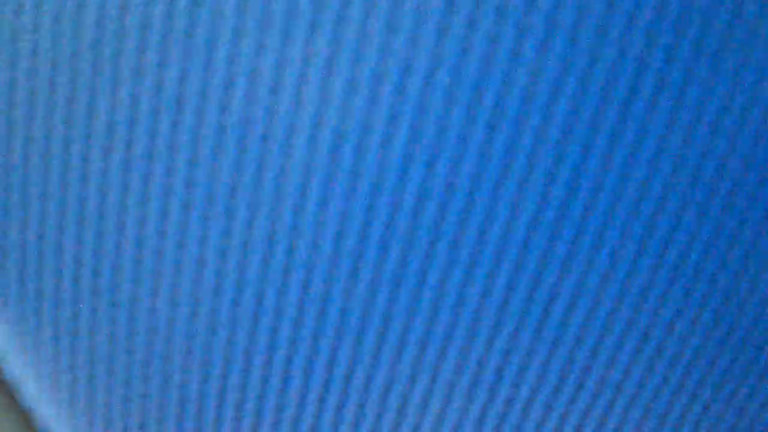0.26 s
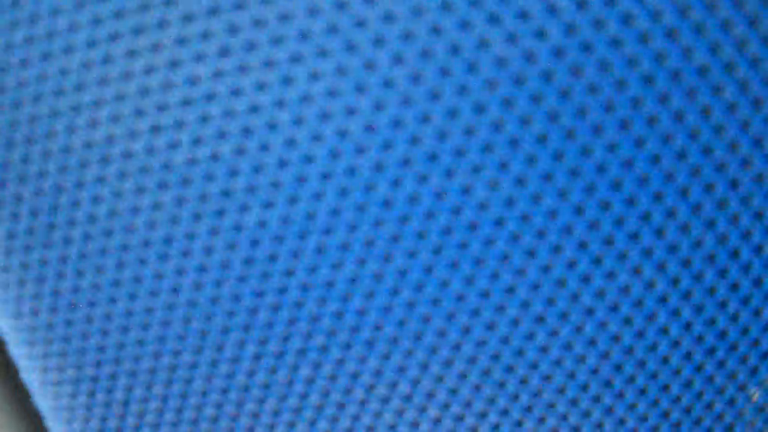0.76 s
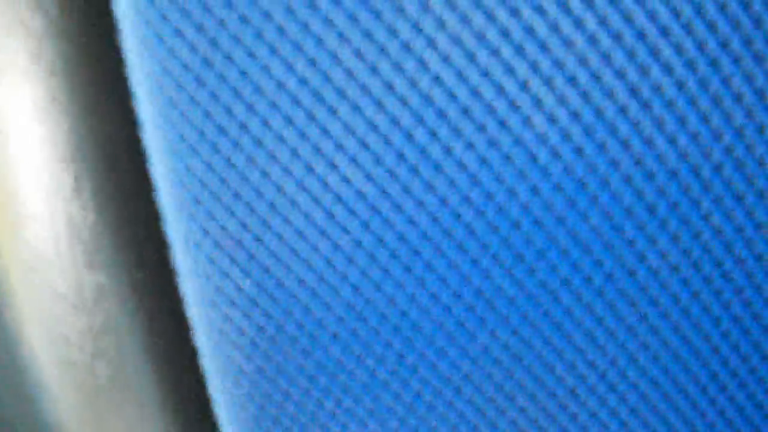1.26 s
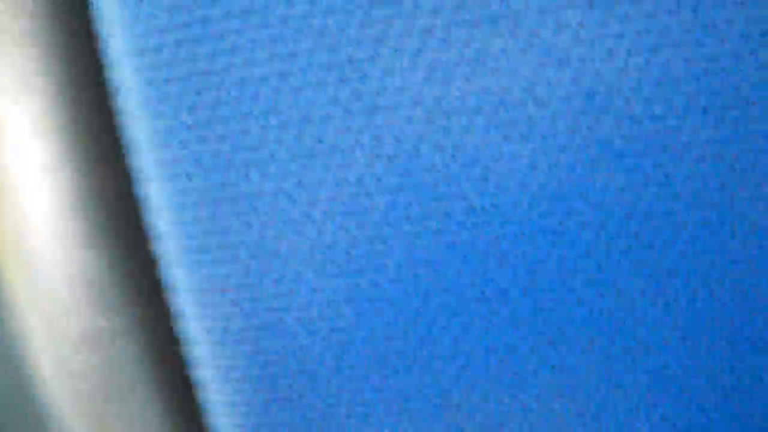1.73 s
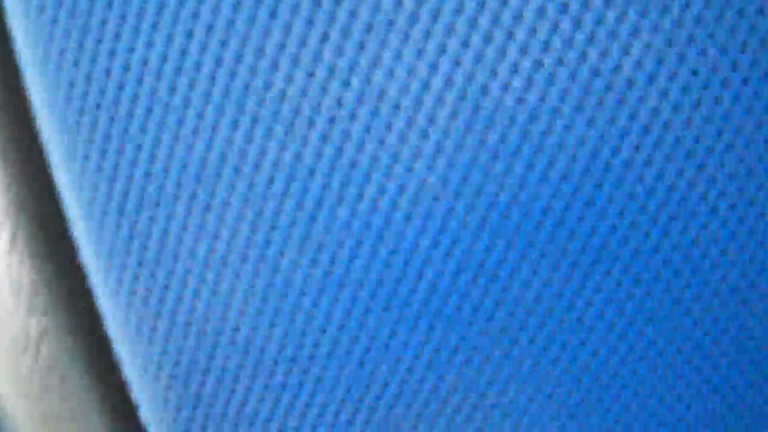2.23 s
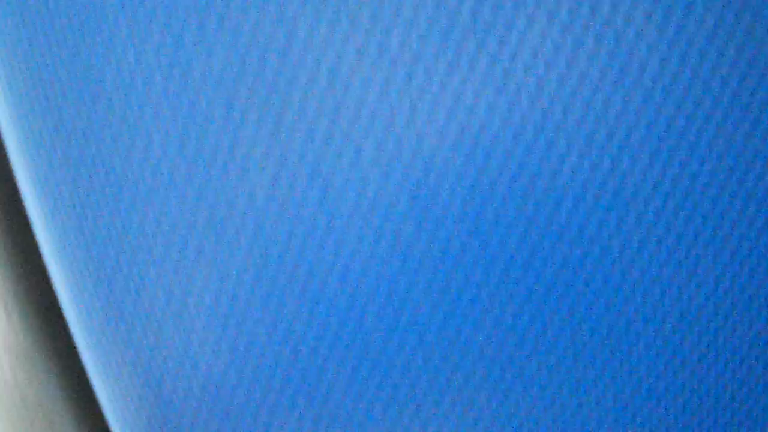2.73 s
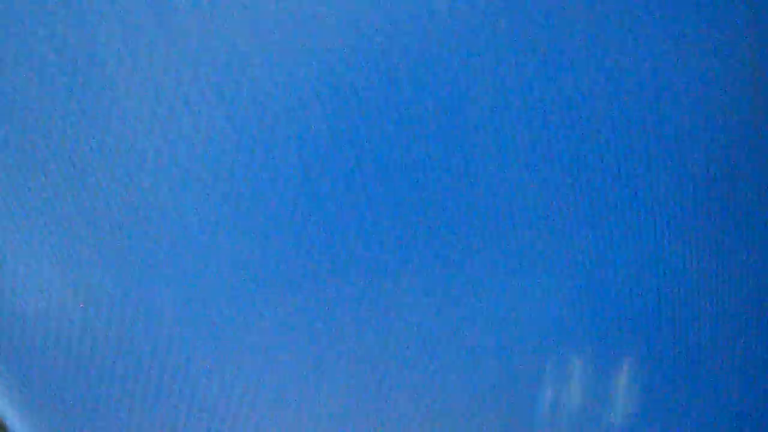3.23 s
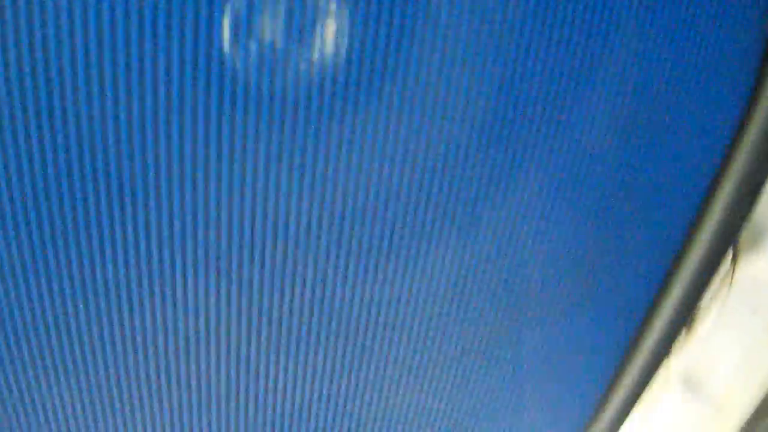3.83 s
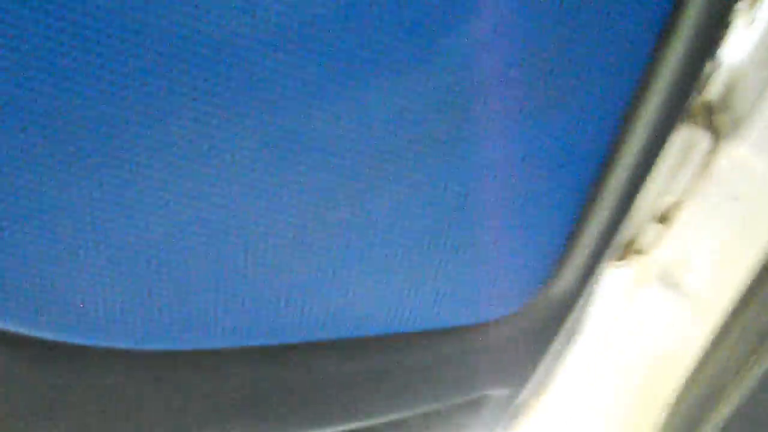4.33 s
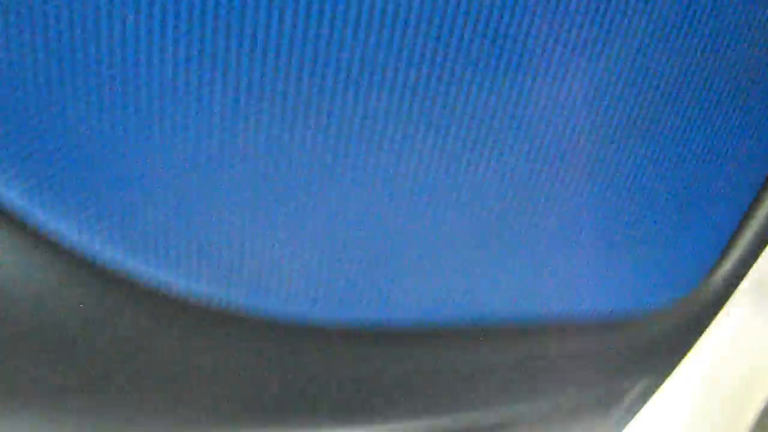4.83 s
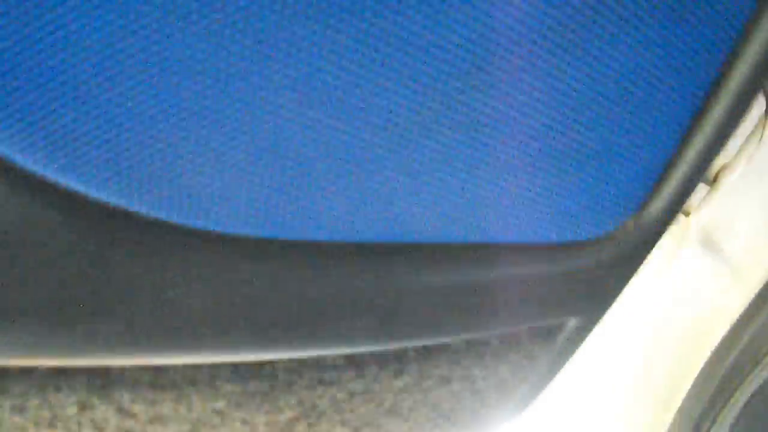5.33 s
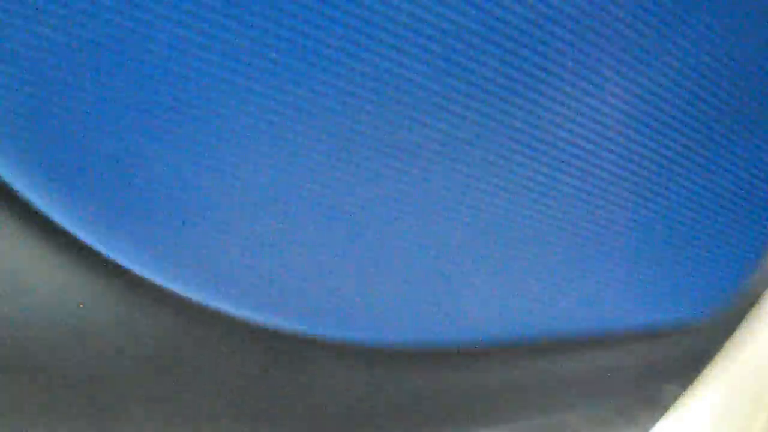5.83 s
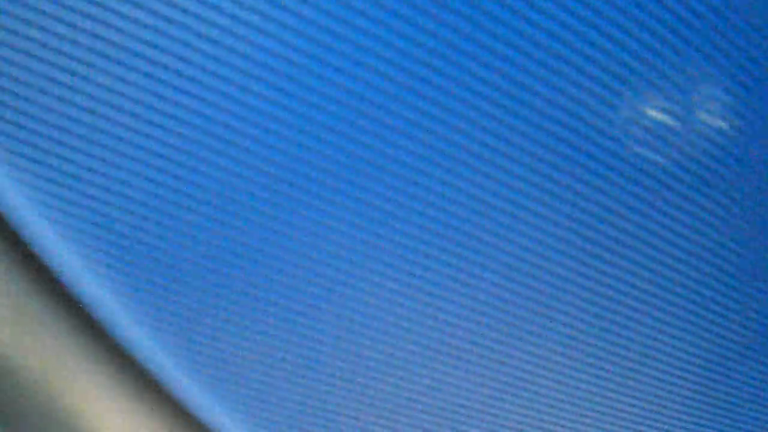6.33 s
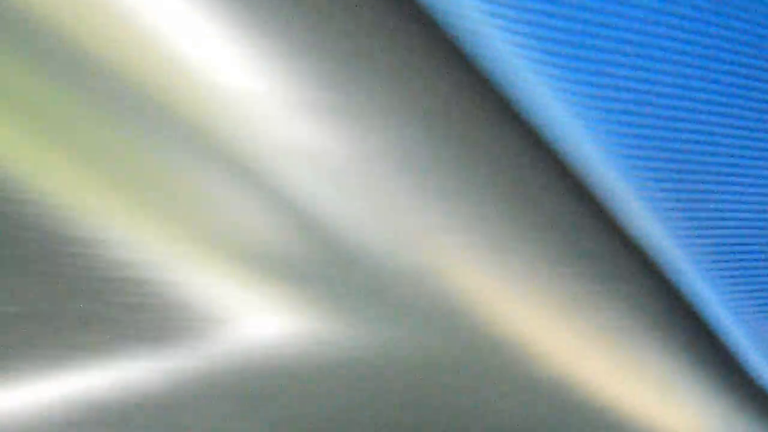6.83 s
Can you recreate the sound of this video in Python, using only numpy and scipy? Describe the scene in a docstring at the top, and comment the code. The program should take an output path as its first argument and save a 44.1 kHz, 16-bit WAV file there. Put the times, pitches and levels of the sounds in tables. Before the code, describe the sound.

A machine hums over a low rumble and airy hiss while a stiff brush works at a vehicle's carpet, heard close to the floor. Short, hissing strokes grow raspier, some ending in a bright flick, with dull thumps and taps on plastic trim between them. One loud knock briefly hushes the background. The scrubbing carries on and ends with a quick clatter against the trim and a tiny rising squeak.

```python
"""Inside a vehicle's padded cabin, one small microphone close to the floor carpet.
A stiff brush scrubs in quick strokes: bristles hiss, tufts rasp through the pile and drum the floor,
and some strokes end in a bright flick. The brush judders once, thumps the floor, knocks on plastic
trim and squeaks near the end. Behind it a machine hums over rumble and airy hiss; this background
sinks away briefly after the hardest knock."""
import sys
import numpy as np
from scipy import signal
from scipy.fft import rfft, irfft
from scipy.io import wavfile

SR = 44100
rng = np.random.default_rng(int(sys.argv[2]) if len(sys.argv) > 2 else 0)


def transcribe(u):
    """Save the signal u as a 16-bit wav file named by the first command-line argument.

    u: samples, shape (n,) or (channels, n), limited to [-1, 1]; the rate is SR.
    q: integer samples, one column per channel.
    """
    v = np.clip(np.atleast_2d(u).T, -1, 1)
    q = np.round(v * 32767).astype(np.int16)
    wavfile.write(sys.argv[1], SR, q)


N = 312228
TIME = np.arange(N) / SR

# slow drift of the cabin's ambience: (time [s], hum and rumble [dB], airy hiss [dB])
AMBIENCE = [(.1, -38, -44.5), (.7, -34, -42.5), (2.7, -32.5, -39.5), (3.25, -34, -40), (3.85, -29, -41.5),
            (4.4, -30, -38.5), (4.8, -34.5, -43), (6.3, -40.5, -46.5), (6.85, -33.5, -43.5),
            (7.08, -43.5, -46)]


def amp(db):
    """Decibels to gain."""
    return 10 ** (np.asarray(db) / 20)


def unit(x):
    """Scales to rms 1."""
    return x / np.sqrt(np.mean(x ** 2) + 1e-20)


def add(mix, start_s, sound):
    """Mixes a sound in at start_s, or at zero if that is negative."""
    part = mix[max(round(start_s * SR), 0):][:len(sound)]
    part += sound[:len(part)]


def colour(x, spectrum):
    """Filters by a spectrum of (frequency [Hz], level [dB]) points; rms 1."""
    hz, db = np.transpose(spectrum)
    bins = np.fft.rfftfreq(len(x), 1 / SR)
    gain = amp(np.interp(np.log(bins + 1), np.log(hz), db))
    return unit(irfft(rfft(x) * gain, len(x)))


def ring(x, resonances):
    """Steep parallel resonances, each (frequency [Hz], width [Hz], level [dB]); rms 1."""
    out = 0
    for hz, width, db in resonances:
        b, a = signal.iirpeak(hz, hz / (1.55 * width), fs=SR)
        late = np.roll(x, round(SR / hz * 2))  # low modes take longer to swell
        out = out + amp(db) * signal.lfilter(b, a, signal.lfilter(b, a, late))
    return unit(out)


def swept(x, hz, width_hz):
    """A resonance that follows the curve hz; rms 1."""
    turn = np.exp(2j * np.pi * np.cumsum(hz) / SR)
    pole = np.exp(-np.pi * width_hz / SR)
    return unit((turn * signal.lfilter([1], [1, -2 * pole, pole * pole], x / turn)).real)


def wander(rate_hz):
    """Smooth random drift up to about rate_hz; rms 1."""
    steps = TIME[::16]
    bins = np.fft.rfftfreq(len(steps), steps[1])
    spectrum = rfft(rng.standard_normal(len(steps))) * np.exp(-(bins / rate_hz) ** 2)
    return unit(np.interp(TIME, steps, irfft(spectrum, len(steps))))


def clicks(per_s, spread_db):
    """Bristles slip off fibres in random clicks of uneven size; rms 1."""
    size = amp(spread_db * np.minimum(rng.exponential(1, N), 3.5))
    return unit(size * rng.choice([-1, 1], N) * (rng.random(N) < per_s / SR))


def panel_echoes(x, strength, delay_s=0.000688):
    """Two echoes off nearby panels comb the sound; their delays shift as the brush moves."""
    samples = np.arange(N)
    lags = [SR * delay_s * path * (1 + .13 * wander(3)) for path in np.sqrt([1, 6])]
    return unit(x + strength * sum(np.interp(samples - lag, samples, x) for lag in lags))


def stroke_shape(t, length, attack, swell_db, release_db_per_s, touch_db=-16):
    """Gain of one stroke: the brush bites, pressure builds or eases, the brush lifts."""
    bite_db = touch_db * np.maximum(1 - t / attack, 0) ** 2
    pressure_db = swell_db * (np.clip(t / length, 0, 1) - .5)
    return amp(bite_db + pressure_db - release_db_per_s * np.maximum(t - length, 0))


def scrubbing(lead_s=.05):
    """The hand's motion: gains of hiss, rasp, drumming and treble, and the floor's note in Hz."""
    # strokes across the carpet, the last row the rub beneath the squeak: (start [s], length [s], attack [s],
    # swell [dB], hiss [dB], rasp [dB], # drumming [dB], extra treble [dB], pitch of the patch under the brush
    # [Hz])
    strokes = [ (-.012, 0.11, 0.013, 1.5, -24.5, -28.5, -29, -7, 580),
               (0.211, 0.086, 0.042, -15, -39, -45, -43, 0, 490),
               (0.407, 0.14, 0.0074, -1, -25.5, -27.5, -27, -7.5, 400),
               (0.542, 0.12, 0.013, -10, -33, -33, -36, -3, 504),
               (0.797, .11, 0.011, 10.5, -37.5, -39.5, -35.5, -2, 470),
               (0.947, 0.16, 0.09, 0.5, -29.5, -36, -33.5, -4.5, 506),
               (1.266, 0.22, 0.013, -0.5, -30, -37.5, -32.5, -3.5, 524),
               (1.736, 0.14, 0.038, 6.5, -25, -51, -31, -9, 530),
               (2.126, 0.13, 0.018, 6.5, -23.5, -42, -29, -8, 477),
               (2.535, 0.14, 0.03, 2.5, -23, -27, -29, -4.5, 470),
               (2.994, 0.12, 0.032, 5, -21, -28.5, -25, -8, 784),
               (3.503, 0.089, .007, 6, -27.5, -24.5, -30, 0.5, 593),
               (3.687, 0.066, .03, 3, -40.5, -40, -61, 3, 396),
               (3.999, 0.17, 0.045, 8.5, -27, -21, -28.5, 0.5, 538),
               (4.473, 0.21, 0.043, 11, -26, -19.5, -29, 4, 506),
               (4.954, 0.13, 0.033, 9.5, -31, -25.5, -34, 2, 551),
               (5.111, 0.076, 0.011, 3.5, -43, -38.5, -50, 8, 605),
               (5.475, 0.12, 0.044, 1, -44.5, -36.5, -47, 5.5, 607),
               (5.593, 0.065, 0.024, 0, -37.5, -39, -40, 9, 575),
               (6.001, 0.14, 0.013, 11, -30.5, -27, -28.5, 1.5, 428),
               (6.3, 0.018, 0.014, 2, -45, -42, -44, 2, 580),
               (6.548, .14, 0.021, 4.5, -32, -26.5, -28, 1, 566),
               (6.78, 0.058, 0.01, -7, -50, -36.5, -31, -17, 493), ]
    # bent bristles flick free as a stroke ends:
    # (time [s], length [s], hiss [dB], rasp [dB], drumming [dB], pitch of the patch [Hz])
    end_flicks = [ (0.111, 0.01, -23.5, -50, -26, 440), (1.857, 0.029, -22, -33, -28.5, 435),
                  (2.268, 0.013, -23, -56, -24, 365), (2.67, 0.016, -16, -67, -14.5, 453),
                  (3.127, 0.03, -14.5, -31, -17.5, 440), (4.666, 0.035, -13.5, -20, -16, 733),
                  (5.177, 0.061, -42, -48, -54.5, 693), (5.615, 0.018, -31, -32, -47, 695),
                  (6.151, 0.019, -20, -60, -28, 460), ]
    swell_shares, releases_db_per_s = (1.0, 0.27, 0.44), (845, 900.5, 479)  # hiss, rasp, drumming
    t = np.arange(SR // 2) / SR - lead_s
    moves = []
    for start, length, attack, swell_db, *levels, treble_db, hz in strokes:
        gains = [amp(db) * stroke_shape(t, length, attack, share * swell_db, release)
                 for db, share, release in zip(levels, swell_shares, releases_db_per_s)]
        moves.append((start, hz, gains + [amp(treble_db) * gains[0]]))
    for start, length, *levels, hz in end_flicks:
        gains = [amp(db) * np.exp(-2 * (t / length) ** 2) for db in levels]
        moves.append((start, hz, gains + [gains[0]]))
    power, weighted_hz = np.zeros((4, N)), np.zeros(N)
    for start, hz, gains in moves:
        skip = max(round((lead_s - start) * SR), 0)
        for layer, gain in zip(power, gains):
            add(layer, start - lead_s, gain[skip:] ** 2)
        add(weighted_hz, start - lead_s, hz * gains[2][skip:] ** 2)  # louder drumming sets the note
    patch_hz = np.clip(weighted_hz / (power[2] + 1e-30), 300, 900)
    travel = 1 + 0.13 * wander(20)  # the note drifts as the brush travels
    return *np.sqrt(power + 1e-20), patch_hz * travel


def bristle_song():
    """Stiff bristles sing as they drag, their notes drifting as they bend."""
    # the bristles' notes: (frequency [Hz], width [Hz], level relative to the hiss [dB])
    notes = [(1455, 130, -18.5), (2432, 160, -16)]
    bend = 1 + .035 * wander(12)
    return sum(amp(db) * swept(clicks(3000, 2), hz * bend, width) for hz, width, db in notes)


def bristle_hiss(slips, force, treble_gain, hard_db=-22, treble_hz=5000):
    """Many tiny slips merge into a hiss that brightens under pressure."""
    # bristles bent lightly: (frequency [Hz], spectral level [dB])
    light_spectrum = [(760, -23), (1300, -6.5), (1500, -5), (1710, -12.5), (1910, 0), (2430, 1.5),
                      (2910, -2), (4010, 1), (4500, -2.5), (6670, -5), (9880, -10.5), (10600, -15),
                      (11000, -28.5), (14300, -52.5), (22000, -120)]
    # bristles flicking free under pressure: (frequency [Hz], spectral level [dB])
    hard_spectrum = [(940, -12), (1600, -7.5), (2010, -11), (2680, -4), (3180, -8.5), (3700, -3),
                     (5410, -8), (5770, -5), (6250, -7), (7170, -5.5), (9830, -11), (10700, -18.5),
                     (11000, -22.5), (14300, -46.5), (22000, -120)]
    hardness = .5 + .5 * np.tanh((20 * np.log10(force) - hard_db) / 5)
    hiss = (1 - hardness) * colour(slips, light_spectrum) + hardness * colour(slips, hard_spectrum)
    treble = signal.sosfiltfilt(signal.butter(2, treble_hz, "high", fs=SR, output="sos"), hiss)
    body = hiss - treble + (1 - hardness) * bristle_song()
    return force * body + treble_gain * treble


def brush(tuft_share=0.38, rasp_db=-3.5):
    """Close up, single bristles hiss; whole tufts catch and let go, shaking brush head and floor."""
    # resonances of the brush head: (frequency [Hz], width [Hz], level [dB])
    head_modes = [(964, 70, 3), (1052, 178, 4.5), (1292, 110, 1.5), (1507, 194, 5), (1706, 330, 1)]
    # resonances of the floor: (frequency [Hz], width [Hz], level [dB])
    floor_modes = [(312.8, 142, -2), (437, 56, -4.5), (675, 49, -10.5), (754, 133, -2)]
    force, rasp_gain, drum_gain, treble_gain, patch_hz = scrubbing()
    clumps = wander(83)
    grip = amp(0.8 * wander(25))  # the pile grips unevenly
    tufts = clicks(2600, 1.4)
    slips = np.sqrt(1 - tuft_share) * clicks(14000, 1.9) + np.sqrt(tuft_share) * tufts
    catches = tufts + 0.51 * rng.standard_normal(N)
    slips = panel_echoes(slips * amp(1.16 * clumps), strength=.17)
    catches = panel_echoes(catches * amp(0.8 * clumps), strength=.15)
    hiss = bristle_hiss(slips, force, treble_gain)
    rasp = amp(rasp_db) * rasp_gain * ring(catches, head_modes)
    patch = swept(clicks(3000, 2.5), patch_hz, width_hz=130)  # each patch of floor has its own note
    drumming = drum_gain * unit(ring(catches, floor_modes) + 0.85 * patch)
    return hiss + grip * (rasp + drumming)


def background(machine_hz=63.6, hum_share=.46):
    """Farther off, a machine's slowly wavering hum over low rumble and airy hiss."""
    # orders of the hum: (multiple of the running speed, level [dB])
    orders = [(1, -5), (2, 0), (3, -5), (4, -10), (5, -17), (6, -10), (7, -21), (8, -16)]
    # low rumble: (frequency [Hz], spectral level [dB])
    rumble_spectrum = [(12, -22), (25, -6.5), (50, -2.5), (85, -0.5), (110, -5.5), (170, -9.5),
                       (300, -12.5), (450, -20.5), (800, -37), (1500, -58)]
    # airy hiss: (frequency [Hz], spectral level [dB])
    air_spectrum = [(290, -41), (500, -2), (673, 2.5), (728, -1), (955, -1.5), (1870, -4.5), (2330, -4),
                    (4220, -7.5), (6310, -11.5), (7270, -18), (8490, -10.5), (10200, -12.5), (11000, -27),
                    (14300, -59), (22000, -120)]
    times, low_db, air_db = np.transpose(AMBIENCE)
    phase = 2 * np.pi * np.cumsum(machine_hz * (1 + .003 * wander(2))) / SR
    hum = unit(sum(amp(db + 1.5 * wander(2)) * np.sin(order * phase + 2 * np.pi * rng.random())
                   for order, db in orders))
    rumble = colour(rng.standard_normal(N), rumble_spectrum)
    low = np.sqrt(hum_share) * hum + np.sqrt(1 - hum_share) * rumble
    flutter = amp(-0.44 * wander(25))
    air = flutter * colour(rng.standard_normal(N), air_spectrum)
    return amp(np.interp(TIME, times, low_db) - 1) * low + amp(np.interp(TIME, times, air_db)) * air


def rustle(relative_db=-11):
    """Loose bristles shift faintly against the pile, in chance swells under the airy hiss."""
    times, _, air_db = np.transpose(AMBIENCE)
    swells_db = 5 * np.minimum(wander(6.7), 2)
    level = amp(relative_db + np.interp(TIME, times, air_db) + swells_db)
    return level * ring(clicks(3700, 2.5), [(7000, 2200, 0)])


def judder(start_s=0.409, attack_s=0.013, hold_s=0.051, fall_db_per_s=190, level_db=-12, slip_hz=108):
    """The bristles stick and slip in uneven jerks as the brush is pushed down, then settle."""
    # resonances shaken by the jerks: (frequency [Hz], width [Hz], level [dB])
    modes = [(211, 42, 2), (304.5, 21, -0.5), (435, 180, -6), (1083, 250, -15), (1520, 110, -19),
             (2030, 240, -24.5), (2665, 170, -16)]
    t = TIME - start_s
    level = np.clip(t / attack_s, 0, 1) * amp(level_db - fall_db_per_s * np.maximum(t - hold_s, 0))
    turns = np.cumsum(slip_hz * (1 + .16 * wander(59.4))) / SR
    jerks = unit(np.diff(np.floor(turns), prepend=0))  # one pulse a turn
    grit = clicks(2500, 6.2)
    return level * ring(jerks + grit, modes)


def thumps(rough_db=1.1):
    """The padded floor booms and dies away unevenly, its pitch sagging as the push lets off."""
    # soft blows on the floor: (time [s], peak [dB], pitch [Hz], rise [s], t60 [s])
    blows = [(.425, -21, 103, .0073, 0.51), (.799, -3, 93, 0.018, 0.047), (0.839, -12, 108, 0.0037, 0.1),
             (1.279, -19, 83.4, 0.011, 0.094), (2.126, -19, 77, .016, 0.081),
             (3.946, -18, 134, 0.0066, .11), (4.389, -20, 230, .003, 0.056),
             (4.497, -14, 125, 0.017, 0.026), (4.641, -14, 127, 0.0027, 0.11),
             (4.893, -18, 86.6, 0.021, 0.11), (5.056, -22, 99, .014, 0.04),
             (5.404, -32, 109, 0.0099, 0.041), (6.02, -10.5, 99, 0.0077, 0.16),
             (6.11, -19.5, 104, .009, 0.1), (6.456, -14.5, 244, 0.0049, .026),
             (6.475, -22, 264, 0.0026, 0.15), (6.55, -11.5, 194, .0019, 0.057),
             (6.563, -4.5, 93.7, 0.0053, 0.16), (6.57, -13.5, 263, 0.0033, 0.098),
             (6.661, -11, 212, 0.006, 0.02)]
    out, t = np.zeros(N), np.arange(SR // 3) / SR
    sag = 1 + .05 * (2 * np.exp(-t / .02) - 1)
    for start, db, hz, rise, t60 in blows:
        swell = np.sin(np.pi / 2 * np.minimum(t / rise, 1)) ** 2
        decay = amp(-60 * np.maximum(t - rise, 0) / t60)
        phase = 2 * np.pi * np.cumsum(hz * sag) / SR
        add(out, start, amp(db) * swell * decay * np.sin(phase))
    return out * amp(rough_db * wander(70))


def knocks(focus_db_per_octave=6, crack_t60=0.033, rattle_db=-27, rattle_t60=0.2):
    """The brush hits the trim: a crack and ringing modes, weighted to its pitch, and a cabin rattle."""
    # hits on the trim: (time [s], level [dB], focus pitch [Hz], crack [dB], ring time [factor])
    hits = [(.804, -28.5, 900, -1, 2.2), (.495, -19, 4800, 3, 2.1), (2.129, -17, 448, -10, 2),
            (3.3396, -10, 1090, -11, 0.73), (3.756, -23, 1100, -6.5, 1.2), (3.927, -18, 1300, -26, 0.23),
            (3.945, -16, 1000, -13, 0.58), (4.39, -16.5, 520, -11.5, 0.75), (4.498, -16, 1310, -30, 1.2),
            (4.8858, -26.5, 1650, -8, 1.2), (5.097, 6.5, 1050, -8, 0.96), (5.412, -43, 1200, -19, 2.2),
            (6.005, -16, 1500, -22, 0.54), (6.09, -14.5, 1200, -19, 1.6), (6.456, -29.5, 650, -0.5, 2.7),
            (6.561, -12, 450, -19, 0.94), (6.572, -9, 560, -3.5, 1.3), (6.572, -30, 3800, -12, 0.81),
            (6.6356, -11, 664, -9, 1.1), (6.666, -21, 600, -12, 1), (6.712, -19.5, 646, -7.5, 2),
            (6.741, -19.5, 477, -11, 1.6), (6.783, -29, 650, -10, 1.8)]
    # modes of the plastic trim: (frequency [Hz], level [dB], base t60 [s])
    trim_modes = [(247, -4.5, 0.082), (382, 3, 0.027), (514, -2, 0.031), (687, 0.5, 0.04),
                  (1036, -1.5, 0.022), (1146, -8, 0.059), (1350, -1.5, 0.035), (2053, -8, 0.045),
                  (2540, -19.5, 0.029), (3900, -19.5, 0.017), (5840, -8, 0.02), (6460, -10.5, 0.04)]
    mode_hz, mode_db, t60 = np.transpose(trim_modes)[:, :, None]
    crack_hz, crack_shape = np.transpose(
        [(200, -9.5), (900, -6.5), (3000, -0.5), (7000, -1), (11000, -16.5)])
    rattle_spectrum = [(80, -14), (260, 4), (1300, 1), (2200, -5.0), (9000, -28.5)]
    polarity = (-1) ** np.arange(len(trim_modes))[:, None]
    out, t = np.zeros(N), np.arange(SR // 5) / SR
    for start, db, hz, crack_db, ring_factor in hits:
        weight = amp(mode_db - focus_db_per_octave * abs(np.log2(mode_hz / hz)))
        modes = amp(-60 * t / (t60 * ring_factor)) * np.sin(2 * np.pi * mode_hz * t)
        ringing = (polarity * weight * modes).sum(0) / np.linalg.norm(weight)
        crack_noise, rattle_noise = rng.standard_normal((2, len(t)))
        focused_db = crack_shape - focus_db_per_octave * abs(np.log2(crack_hz / hz))
        crack = colour(crack_noise, np.transpose([crack_hz, focused_db]))
        crack *= amp(crack_db - 60 * t / (crack_t60 * ring_factor))
        rattle = colour(rattle_noise, rattle_spectrum) * amp(rattle_db - 60 * t / rattle_t60)
        add(out, start, amp(db) * (ringing + crack + rattle))
    return out


def dip(start_s=5.175, fall_s=0.088, hold_s=0.45, recover_s=0.65, depth_db=-15):
    """Gain of the ambience just after the hardest knock: a quick fall, a hush, a slow return."""
    corners = np.cumsum([start_s, fall_s, hold_s, recover_s])
    return amp(depth_db * np.interp(TIME, corners, [0, 1, 1, 0]))


def squeak(start_s=6.778, length_s=.078, start_hz=385, rise_hz_per_s=2900, level_db=-28.5, rasp_db=-8):
    """A brief rising note of rubbing plastic, with a rasp at every slip."""
    t = np.clip(TIME - start_s, 0, length_s)
    hz = (start_hz + rise_hz_per_s * t) * (1 + 0.0254 * wander(150))
    phase = 2 * np.pi * np.cumsum(hz) / SR
    rasp = ring((1 + np.cos(phase)) * rng.standard_normal(N), [(1180, 300, 0), (2280, 440, 2)])
    swell = np.sin(np.pi * t / length_s) ** 2
    return amp(level_db) * swell * (unit(np.sin(phase)) + amp(rasp_db) * rasp)


def scene():
    """The brush work up close and the ambience behind it, in mono."""
    foreground = brush() + judder() + thumps() + knocks() + squeak()
    ambience = dip() * (background() + rustle())
    return (foreground + ambience)[None]


def record(dry, gain=.93, edge_hz=11050):
    """The hardest knock overloads the microphone input softly; the top end is then cut off."""
    driven = gain * dry
    clipped = driven / (1 + driven ** 8) ** (1 / 8)
    lowpass = signal.firwin(301, edge_hz, window=("kaiser", 8), fs=SR)
    return signal.oaconvolve(clipped, lowpass[None], "same")


dry = scene()
out = record(dry)
transcribe(out)
```